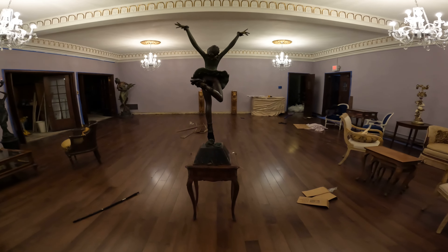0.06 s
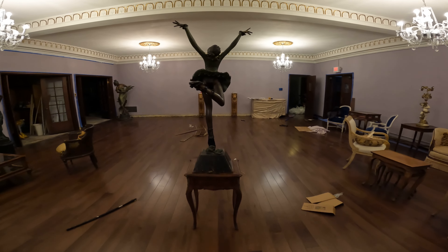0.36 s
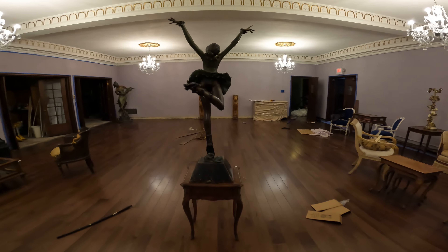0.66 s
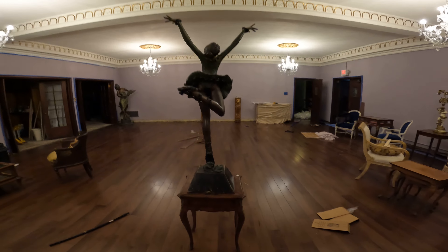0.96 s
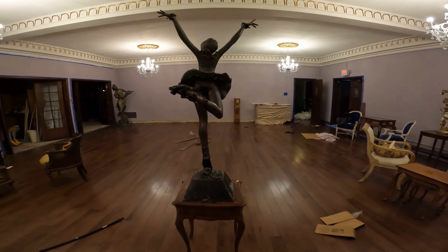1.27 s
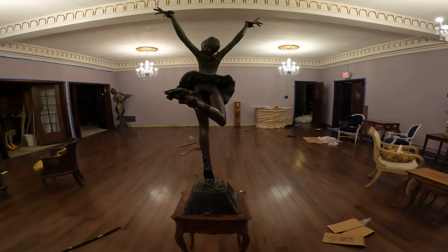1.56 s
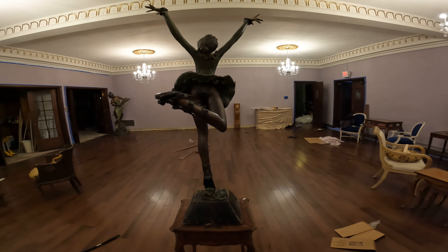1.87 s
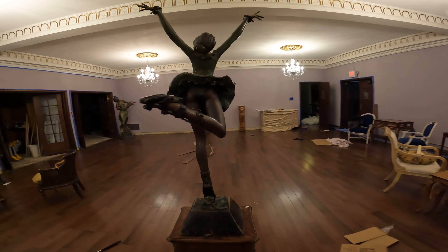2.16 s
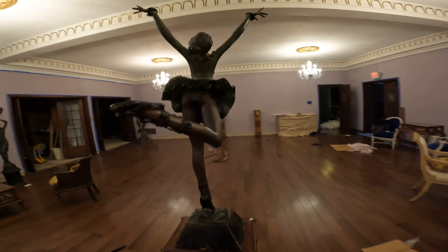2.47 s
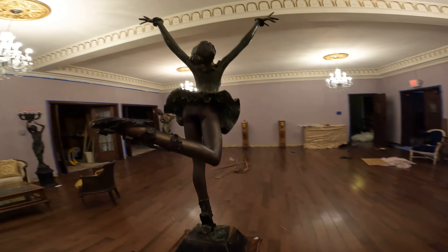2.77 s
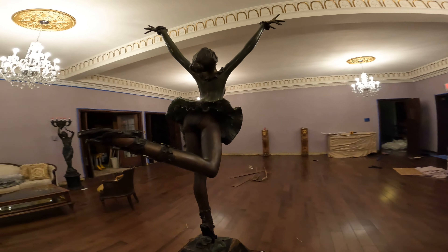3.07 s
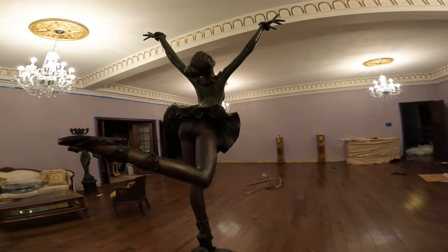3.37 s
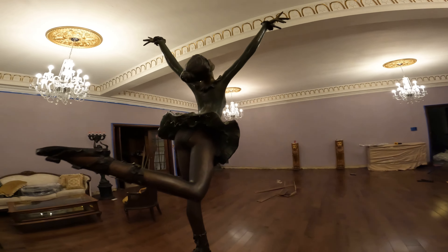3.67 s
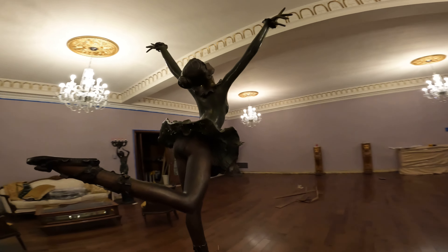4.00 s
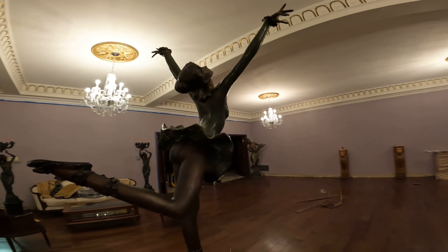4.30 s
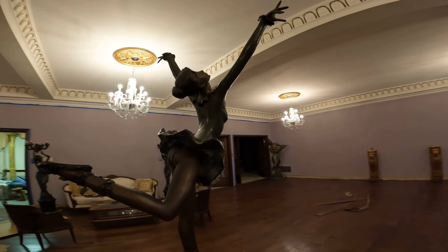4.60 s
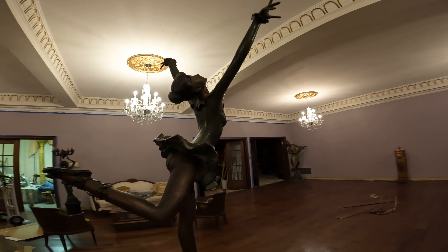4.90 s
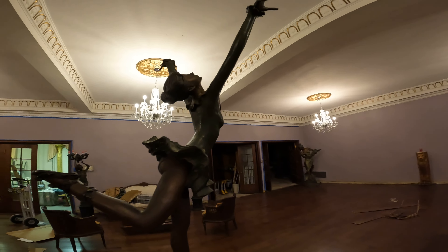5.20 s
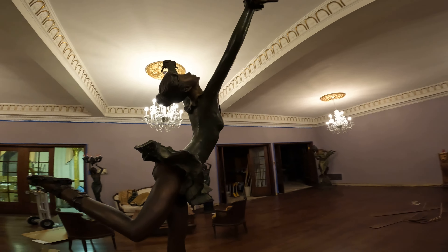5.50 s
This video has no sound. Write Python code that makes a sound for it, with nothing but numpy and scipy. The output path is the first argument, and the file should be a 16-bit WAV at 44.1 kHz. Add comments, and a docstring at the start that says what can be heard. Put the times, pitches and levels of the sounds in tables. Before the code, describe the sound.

Unhurried footsteps on wooden boards, about one a second, are heard from a microphone the walker carries through a big, echoing room. The six steps mix heel taps with short, gritty scuffs, the second having the sharpest click. Faint cloth swishes and a deep, soft rumble lie over still room tone. Just after the last step, a nearby loose object gives a quick, lightly ringing chatter.

```python
"""A heel taps on hardwood and a sole scuffs along the grain: six slow steps in a large, quiet hall.
The boards knock and boom under the weight, the sole chirrs where it grips, and the hall rings on.
Trouser legs swish between steps and the camera that the walker carries rumbles as it sways.
At the end something loose chatters close by, ringing in two modes over the still air."""
import sys
import numpy as np
from scipy import signal
from scipy.fft import rfft, irfft, next_fast_len
from scipy.io import wavfile
from scipy.ndimage import uniform_filter1d

SR = 44100
rng = np.random.default_rng(int(sys.argv[2]) if len(sys.argv) > 2 else 0)


def wav_out(sig):
    """Save sig, one row per channel (or a flat mono array), as 16-bit PCM at SR to the path in sys.argv[1]."""
    wavfile.write(sys.argv[1], SR, np.round(np.clip(np.atleast_2d(sig).T, -1, 1) * 32767).astype(np.int16))


N = 244696
TIME = np.arange(N) / SR

# Footsteps: (touch-down [s], time to full pressure [s], slide [s], relative level [dB],
# first touch against full pressure [dB], easing over the slide [dB], weight as low-band lift [dB],
# speed as high-band lift [dB], relative boom level [dB])
STEPS = [(0.353, 0.043, 0.21, -45.5, -8, -10, -14.5, 0.5, -65),
         (1.231, 0.059, 0.13, -33, -10, -11.5, -6.5, -10.5, -61),
         (2.178, 0.06, 0.23, -40.5, -12, -17, -12, -6, -58),
         (3.265, 0.045, 0.16, -31.5, -19.5, -11, -12, -10, -76),
         (4.066, 0.047, 0.14, -43.5, -10, -11, -7.5, -5.5, -55),
         (4.875, 0.13, 0.21, -31.5, -35, -13.5, -13.5, -11, -79)]
# Sole rubbing on wood: (frequency [Hz], level [dB])
SOLE_SPECTRUM = [(88, -43), (150, -29.5), (244, -16), (284, -24.5), (366, -9.5), (480, -15), (655, -10.5),
                 (826, -11), (1040, -1.5), (2180, -2), (3400, -2), (7390, -14), (8640, -23), (12500, -31),
                 (15400, -50)]
# Where weight deepens the rub: (frequency [Hz], share of the lift [ratio])
WEIGHT_EQ = [(200, 1), (450, 0.87), (800, 0.65), (1500, 0.84), (3000, 0)]
# Where speed brightens the rub: (frequency [Hz], share of the lift [ratio])
SPEED_EQ = [(3000, 0.02), (5500, 0.19), (7500, 0.89), (10000, 0.97), (14000, 1.2)]
# Moments of hard grip: (time [s], length [s], relative level [dB])
GRIPS = [(0.379, 0.014, -50), (1.266, 0.034, -38.5), (3.274, 0.017, -53), (3.291, 0.077, -42),
         (4.971, 0.025, -37.5)]
# The sole's own resonance: (frequency [Hz], level [dB])
GRIP_SPECTRUM = [(1200, -53), (2100, -37), (2600, 3), (3000, 3.5), (3500, -3), (4300, -6), (7000, -73)]
# Heel taps, sole slaps and board knocks:
# (time [s], relative peak [dB], pitch [Hz], bandwidth over pitch [ratio], shudder [dB])
BLOWS = [(0.153, -56, 1450, 0.17, -16), (0.3531, -33, 1080, 0.9, -18), (0.3832, -36, 2070, 2.3, -4),
         (0.5492, -47.5, 695, 1.6, -11), (0.5889, -26.5, 1140, 2.94, -24), (1.2272, -18, 1850, 0.64, -26),
         (1.2276, -28, 616, 0.62, -13.5), (1.2312, -27, 2840, 0.74, -18), (1.287, -29.5, 910, 1.24, -1.5),
         (2.184, -40.5, 487, 1.3, -16.5), (2.228, -33, 1640, 0.84, -12), (2.9337, -47.5, 490, 0.4, -3),
         (3.2723, -36.5, 2210, 0.5, -13), (3.319, -46, 443, 0.59, -9), (4.0046, -44, 375, 1.9, -9.5),
         (4.0473, -34, 351, 0.86, -14.5), (4.1992, -41, 380, 0.62, -16), (4.3591, -49, 257, 1.4, -7.5),
         (5.0011, -40.5, 440, 0.8, -12)]
# The blows grow dull in the top treble: (frequency [Hz], gain [dB])
BLOW_TOP_EQ = [(4000, -1), (7500, -10), (9000, -3), (15000, -18)]
# Floor modes under every blow: (frequency [Hz], relative level [dB], t60 [s])
FLOOR_MODES = [(190, -13, 0.5), (354, 0, .22), (471, 0, 0.29), (647, -5, .25), (1080, 8, 0.13),
               (1190, 9, 0.31)]
# Boom of the loaded boards: (frequency [Hz], level [dB])
BOOM_SPECTRUM = [(80, -33), (125, -8.5), (175, 3), (250, 0), (380, -8), (700, -16), (1500, -41.5)]
# Boards flexing as the rear foot leaves: (time [s], length [s], relative level [dB])
BOARD_FLEXES = [(0.62, 0.18, -67), (2.91, 0.4, -66)]
# Hard contacts of the loose part: (time [s], low mode drive [dB], high mode drive [dB])
HARD_CONTACTS = [(5.310, -32, -27), (5.351, -37.5, -28.5), (5.391, -37, -51), (5.441, -39.5, -37),
                 (5.512, -57, -40)]
# Its light contacts before they fade: (low mode drive [dB], high mode drive [dB])
LIGHT_CONTACT_DB = [-42.5, -34]
# Its two modes: (frequency [Hz], t60 [s])
RATTLE_MODES = [(1022, 0.071), (1634, 0.038)]
# Dull noise of its contacts: (frequency [Hz], level [dB])
CLATTER_SPECTRUM = [(100, -5), (300, -1), (650, 0), (1300, 4.5), (2300, -21), (3500, -18), (6000, -49)]
# Trouser legs brushing: (time [s], length [s], level [dB], extra top treble [dB])
BRUSHES = [(-0.07, 0.06, -77, 5), (0.919, 0.091, -71, 5.5), (1.808, 0.069, -76.5, 11),
           (1.88, 0.55, -74, 10.5), (3.71, 0.12, -70, -2), (3.928, 0.41, -72, -5), (4.58, 0.2, -78.5, -2),
           (5.455, 0.091, -68.5, -3)]
# Hiss of cloth on cloth: (frequency [Hz], level [dB])
CLOTH_SPECTRUM = [(1000, -3), (3500, 8.5), (5300, -6), (7000, 6.5), (8500, -5), (10000, -7), (13000, -13.5),
                  (15500, -37)]
# The band that a quick brush lifts: (frequency [Hz], gain [dB])
BRUSH_TOP_EQ = [(7000, -25), (8500, 0.5)]
# Decay of the hall: (frequency [Hz], t60 [s])
HALL_DECAY = [(150, 1.1), (400, 0.49), (900, 1.23), (1700, 1.13), (3300, 1.01), (5300, 0.59), (7200, 0.66),
              (9000, 0.32), (14000, 0.24)]
# Tone of the hall's tail: (frequency [Hz], gain [dB])
HALL_EQ = [(150, -3.5), (500, -3), (1100, -5), (3500, -4.5), (5300, -6.5), (7200, -3.5), (9500, -10),
           (14000, -34)]
# Sway of the carried camera: (time [s], relative level [dB])
SWAY_LEVEL = [(0, -52), (0.55, -68.5), (0.7, -47.5), (1.15, -55), (1.45, -65.5), (2.35, -69.5), (2.8, -54),
              (3.3, -61), (3.57, -52), (3.75, -58.5), (4.55, -57), (5.2, -63.5), (5.5, -49)]
# Its handling rumble: (frequency [Hz], level [dB])
SWAY_SPECTRUM = [(4, -10.5), (12, 5), (22, -3), (35, -10), (55, -29.5), (100, -41), (250, -71)]
# Room tone: (frequency [Hz], level [dB])
AIR_SPECTRUM = [(35, -21), (60, 1.5), (95, -13), (192, 2), (463, -7), (672, -9), (867, -11), (1350, -6),
                (1960, -14), (3410, -17.5), (5190, -27.5), (7350, -23), (9490, -35.5), (12200, -37),
                (15400, -57)]
# Likeness of diffuse sound at the two microphone ports: (frequency [Hz], correlation [ratio])
PORT_CORRELATION = [(30, 1), (400, 0.74), (1000, 0.62), (3000, 0.4), (4800, 0.66), (7500, 0.38),
                    (10500, 0.44), (12500, 0.11)]
# Colour difference of the ports: (frequency [Hz], left over right [dB])
PORT_BALANCE = [(30, -5), (120, -2), (500, 0.5), (1400, 3), (3200, 0.8), (7000, 2), (12000, 5.5)]


def scuff(press_s, slide_s, db, touch_db, ease_db, weight_db, speed_db, slips_per_s=7000):
    """Tiny slips of the sole over the grain; weight deepens the rub and speed brightens it."""
    t = np.arange(0, press_s + slide_s + 0.25, 1 / SR)
    landing_db = touch_db * np.maximum(1 - t / press_s, 0)
    slid = np.clip((t - press_s) / slide_s, 0, 1)
    size = amp(2 * np.minimum(rng.exponential(1, (2, SR)), 4))
    slips = unit(size * rng.choice([-1, 1], size.shape) * (rng.random(size.shape) < slips_per_s / SR))
    friction = pair(slips + rng.standard_normal(size.shape), diffuse=0.28)
    rub = unit(colour(friction, SOLE_SPECTRUM)[:, :len(t)])
    # Weight arrives just after landing and drains over the slide; a skimming sole sounds brighter.
    load_db = weight_db - 9.5 * np.exp(-t / 0.083) - 6.5 * slid
    skim_db = speed_db - 0.28 * landing_db
    neutral_weight_db, neutral_speed_db = -12, -10
    hz, frames, spectra = signal.stft(rub, SR, nperseg=256)
    deep_db = np.outer(read(WEIGHT_EQ, hz), np.interp(frames, t, load_db) - neutral_weight_db)
    bright_db = np.outer(read(SPEED_EQ, hz), np.interp(frames, t, skim_db) - neutral_speed_db)
    rub = signal.istft(spectra * amp(deep_db + bright_db), SR)[1][:, :len(t)]
    # The sole lands, presses, judders, eases off late in the slide and lifts away.
    attack_s, lift_s, trim_db = 0.007, 0.064, -2.5
    contact = np.minimum(t / attack_s, 1) * np.exp(-np.maximum(t - press_s - slide_s, 0) / lift_s)
    judder_db = 0.66 * unit(uniform_filter1d(rng.standard_normal(SR), size=300))[:len(t)]
    return rub * contact * amp(db + trim_db + landing_db + ease_db * slid ** 1.75 + judder_db)


def chirrs():
    """Where the sole grips hard it chirrs in its own resonance."""
    return swells(GRIPS, rise_s=0.0045, fall_s=0.01) * noise(GRIP_SPECTRUM)


def knock(db, hz, width, shudder_db, skirt_db=21, shudder_s=0.011):
    """A short blow on a damped board, followed by a brief shudder of its neighbours."""
    t = np.arange(4096) / SR
    ratio = (abs(np.fft.fftfreq(len(t), 1 / SR)) + 10) / hz
    log_gain = np.log(amp(-skirt_db * np.log10(1 + ((ratio - 1 / ratio) / width) ** 2)))
    blow = np.fft.ifft(np.exp(np.conj(signal.hilbert(log_gain)))).real  # minimum phase: a sharp attack
    blow /= abs(blow).max()
    shakes = pair(rng.standard_normal((2, len(t)))) * np.exp(-t / shudder_s)
    shudder = signal.fftconvolve(shakes, blow[None] / np.linalg.norm(blow), axes=1)[:, :len(t)]
    return amp(db) * (blow + amp(shudder_db) * shudder)


def floor_ring(knocks, trim_db=-1):
    """The joined boards keep sounding in their modes after a blow."""
    t = np.arange(SR // 2) / SR
    ring = 0
    for hz, db, t60 in FLOOR_MODES:
        fade = decay(t, t60)
        ring += 2 * amp(db + trim_db) * fade / fade.sum() * np.cos(2 * np.pi * hz * t)
    return signal.fftconvolve(knocks, ring[None], axes=1)[:, :N]


def boom(rise_s=0.097, fall_s=0.25):
    """The floor booms softly as weight shifts onto each step; twice it flexes again between steps."""
    load = sum(amp(db) * np.exp(np.minimum((TIME - s) / rise_s, (s - TIME) / fall_s))
               for s, *_, db in STEPS)
    flex = swells(BOARD_FLEXES, rise_s=0.014, fall_s=0.13)
    return (load + flex) * noise(BOOM_SPECTRUM)


def rattle(swell_s=0.0044, detune=0.014, trim_db=-1, clatter_db=-17):
    """Each rubbing contact swells in the loose part's two modes, a little off pitch, and clatters."""
    ring, touch = np.zeros((2, N)), np.zeros((1, N))
    t = np.arange(SR // 4) / SR
    attack = 1 - np.exp(-(t / swell_s) ** 2)
    for s, *levels in list(HARD_CONTACTS) + chatter():
        for db, (hz, t60) in zip(levels, RATTLE_MODES):
            envelope = amp(db + trim_db) * attack * decay(t, t60)
            pitch = hz * (1 + detune * rng.standard_normal())
            add(ring, s, envelope * np.sin(2 * np.pi * pitch * t))
            add(touch, s, envelope)
    return ring + amp(clatter_db) * touch * noise(CLATTER_SPECTRUM)


def chatter(count=12, per_s=52, fade_db_per_s=-46, uneven_db=3):
    """Light, uneven contacts of the loose part, growing weaker: rows like those of the hard ones."""
    after_s = (np.arange(count) + 1 + rng.uniform(-0.5, 0.49, count)) / per_s
    levels = LIGHT_CONTACT_DB + fade_db_per_s * after_s[:, None]
    levels += uneven_db * rng.standard_normal((count, 2))
    return list(np.column_stack([HARD_CONTACTS[0][0] + after_s, levels]))


def swishes(rise_s=0.039, fall_s=0.1):
    """Cloth on cloth: a thin hiss, brighter when the brush is quick."""
    hiss = noise(CLOTH_SPECTRUM)
    top = colour(hiss, BRUSH_TOP_EQ)
    body_gain = swells([(s, length, db) for s, length, db, _ in BRUSHES], rise_s, fall_s)
    top_gain = swells([(s, length, db + extra) for s, length, db, extra in BRUSHES], rise_s, fall_s)
    return body_gain * (hiss - top) + top_gain * top


def hall(x, reflections_per_s=4000, build_s=0.005):
    """Scattered reflections build up, then die away, the top treble first."""
    t = np.arange(SR * 3 // 2) / SR
    taps = rng.standard_normal((2, len(t))) * (rng.random((2, len(t))) < reflections_per_s / SR)
    hz, frames, spectra = signal.stft(pair(taps), SR, nperseg=256)
    t60 = read(HALL_DECAY, hz)[:, None]
    tail = signal.istft(spectra * decay(frames, t60) / np.sqrt(t60), SR)[1][:, :len(t)]
    tail *= 1 - np.exp(-t / build_s)
    tail = colour(tail / np.linalg.norm(tail[0]), HALL_EQ)
    return signal.fftconvolve(x.mean(0)[None], tail, axes=1)[:, :N]


def sway():
    """The carried camera rumbles in the sub-bass as it sways."""
    return amp(np.interp(TIME, *np.transpose(SWAY_LEVEL))) * noise(SWAY_SPECTRUM)


def air():
    """The hall's still air: a steady bed of room tone."""
    return noise(AIR_SPECTRUM)


def amp(db):
    """Decibels to gain."""
    return 10 ** (np.asarray(db) / 20)


def unit(x):
    """Scales to an rms of one."""
    return x / np.sqrt(np.mean(x ** 2) + 1e-20)


def decay(t, t60):
    """A fade of 60 dB every t60 seconds."""
    return np.exp(-np.log(1000) * t / t60)


def swells(rows, rise_s, fall_s):
    """An envelope from (time [s], length [s], level [dB]): each row rises, holds and dies away."""
    return sum(amp(db) * np.clip((TIME - s) / rise_s, 0, 1) ** 2
               * np.exp(-np.maximum(TIME - s - length, 0) / fall_s) for s, length, db in rows)


def read(points, hz):
    """Reads a curve on a log-frequency axis."""
    point_hz, value = np.transpose(points)
    return np.interp(np.log(hz + 1), np.log(point_hz + 1), value)


def bins(x):
    """Frequencies of the spectrum of x."""
    return np.fft.rfftfreq(x.shape[-1], 1 / SR)


def colour(x, points):
    """Equalises by a curve of (frequency [Hz], gain [dB])."""
    n = next_fast_len(x.shape[-1])
    gain = amp(read(points, np.fft.rfftfreq(n, 1 / SR)))
    return irfft(rfft(x, n) * gain, n)[..., :x.shape[-1]]


def panned(x, pan_db):
    """Tips a sound to the left (positive) or right."""
    return x * amp(np.array([[0.5], [-0.5]]) * pan_db)


def pair(x, diffuse=1):
    """Blends two unrelated signals as two nearby ports hear them; less diffuse is narrower."""
    alike = np.clip(read(PORT_CORRELATION, bins(x)), 0, 1) ** diffuse
    mid, side = rfft(x) * np.sqrt([(1 + alike) / 2, (1 - alike) / 2])
    return irfft(np.array([mid + side, mid - side]), x.shape[-1])


def noise(points):
    """Stereo noise of a given spectrum, at an rms of one."""
    return unit(colour(pair(rng.standard_normal((2, N))), points))


def add(mix, s, sound):
    """Mixes a sound in at s seconds."""
    part = mix[:, max(round(s * SR), 0):][:, :sound.shape[-1]]
    part += sound[..., :part.shape[-1]]


def scene():
    """Steps and rattle feed the hall; cloth, boom and sway stay dry over the room tone."""
    rubs, knocks, loose_part = chirrs(), np.zeros((2, N)), rattle()
    for s, *stroke, _ in STEPS:
        add(rubs, s, scuff(*stroke))
    for s, *blow in BLOWS:
        add(knocks, s, knock(*blow))
    knocks = colour(knocks + floor_ring(knocks), BLOW_TOP_EQ)
    reverb = hall(rubs + amp(-2) * knocks + loose_part)
    cloth = panned(swishes(), pan_db=5)
    rumble = amp(0.5) * sway()
    steps = rubs + knocks + amp(-4) * boom()
    return steps + loose_part + cloth + reverb + rumble + amp(-69.5) * air()


def record(dry, cutoff_hz=15600):
    """The two microphone ports differ a little in colour; a steep low-pass trims the very top."""
    heard = irfft(panned(rfft(dry), read(PORT_BALANCE, bins(dry))), N)
    low_pass = signal.firwin(511, cutoff_hz, window=("kaiser", 9), fs=SR)
    return signal.oaconvolve(heard, low_pass[None], "same")


dry = scene()
out = record(dry)
wav_out(out)
```